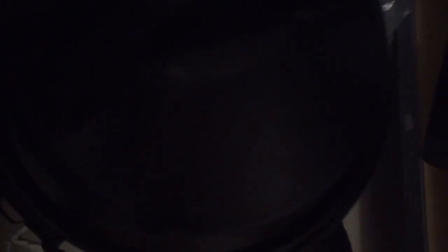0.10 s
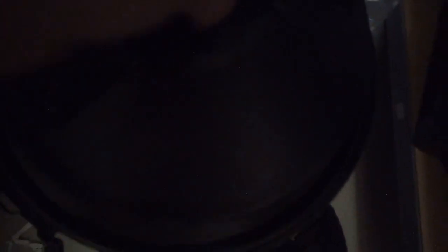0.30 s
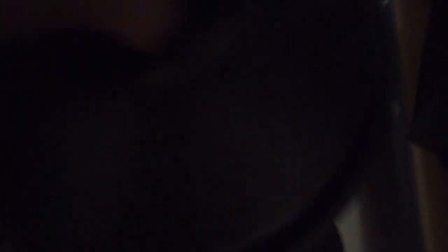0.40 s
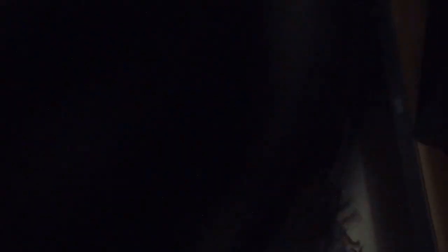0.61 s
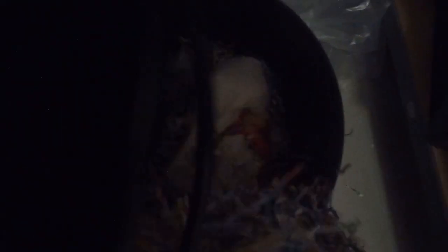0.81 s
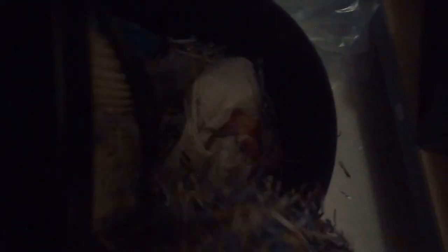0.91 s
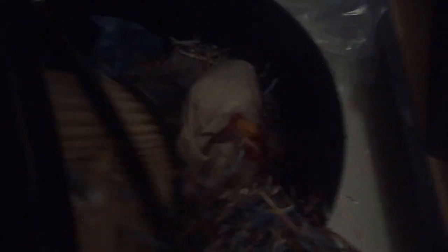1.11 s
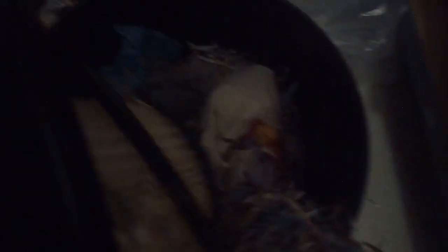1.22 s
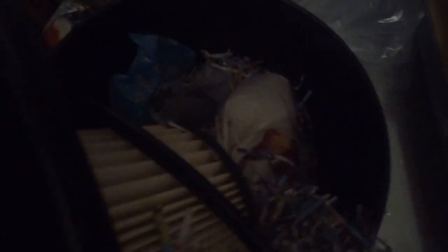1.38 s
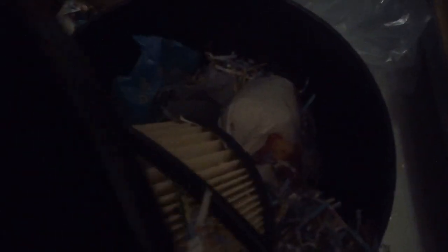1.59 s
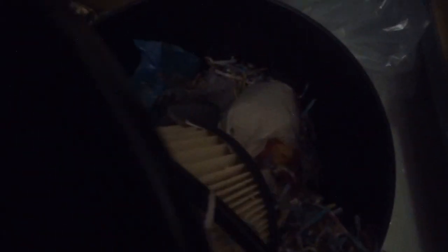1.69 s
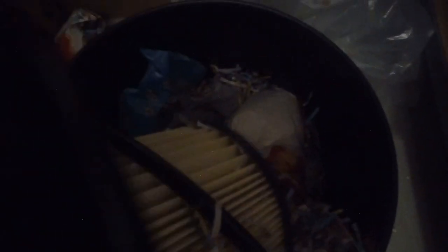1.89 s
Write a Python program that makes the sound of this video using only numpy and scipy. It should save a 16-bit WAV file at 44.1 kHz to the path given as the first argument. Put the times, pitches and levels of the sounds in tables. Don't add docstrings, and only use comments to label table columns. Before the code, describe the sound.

Plastic vacuum lid clatters, rasps and thuds against a drum rim, then groans into near silence

```python
import sys
import numpy as np
from scipy import signal
from scipy.fft import rfft, irfft, next_fast_len
from scipy.io import wavfile
from scipy.ndimage import map_coordinates

SR = 44100
rng = np.random.default_rng(int(sys.argv[2]) if len(sys.argv) > 2 else 0)


def unload_audio(sound):
    columns = np.transpose(np.atleast_2d(sound))
    steps = np.round(np.clip(columns, -1, 1) * 32767)
    wavfile.write(sys.argv[1], SR, steps.astype(np.int16))


def attenuation_scalar(level_db):
    decades = np.asarray(level_db, float) / 20
    return 10 ** decades


N = 83790
T = np.arange(N) / SR

# start in seconds, peak in dB, 60 dB decay in seconds,
# drum share in dB, sharp edge share in dB.
RIM_CONTACTS = [(0.0707, -45, 0.03, -25, 12), (.1575, -60, .06, -20, 3), (0.1995, -36, 0.52, 2.5, 0),
                (0.2165, -39.5, 0.046, 4, 8), (0.2232, -31.5, 0.082, 14.5, 7.5), (.231, -41, 0.051, 7, 7),
                (0.322, -52, .03, -13, 25), (0.3478, -25, 0.29, -28, 9.5), (0.375, -29.5, 0.19, 9, -10),
                (0.404, -30, 0.2, -25, 13), (0.427, -22, 0.14, -13, 10), (0.501, -32.5, 0.027, -2.5, -22.5),
                (0.5018, -26, 0.21, -4.5, -20.5), (.508, -38.5, 0.07, -11, -28),
                (0.575, -42, 0.18, -16, -8.5), (0.6811, -29.5, 0.13, 2, -4.5),
                (0.6877, -25, 0.37, 6.5, -4.5), (0.735, -25, 0.052, -4.5, 2.5), (0.7677, -31, 0.19, -34, 4),
                (.808, -38, 0.15, -14, -8.5), (0.856, -42.5, 0.15, -24.5, 12), (0.8986, -33, 0.2, 7, -24),
                (0.9222, -17.5, 0.23, -25, 8), (0.925, -18, 0.19, -26, 6), (0.9303, -19, .2, -26, 5.5),
                (0.9736, -16.5, 0.1, -36, 11), (0.978, -23, 0.81, -11, 6), (1.022, -20.5, 0.2, -6, -19),
                (1.049, -16, 0.28, -15.5, 8.5), (1.0865, -20.5, 0.03, -9, -3),
                (1.199, -52.5, 0.26, 33, -17), (1.313, -24, 0.24, -9, 9.5), (1.8635, -44, 0.036, -37, 8),
                (1.873, -45.5, 0.14, -21, -9), (1.895, -36, 0.09, -4, -25)]
# frequency in Hz, level in dB per Hz.
RASP_COLOUR = [(150, -24), (400, -36), (650, -10), (1100, 0.5), (2000, -2), (4500, 3), (7000, 3.5),
               (10000, -17.5)]
# frequency in Hz, level in dB per Hz.
EDGE_COLOUR = [(3000, -3), (7500, 14), (16000, 18.5)]
# frequency in Hz, level in dB, 60 dB decay in seconds.
DRUM_MODES = [(283, -10, 0.02), (600, -5, 0.03), (790, 0, 0.06), (855, 1, 0.07), (965, -4, .04),
              (1242, -5, 0.025), (1375, -4, 0.03), (1745, -9, .025), (2250, -7, 0.02), (3660, -15, 0.03)]
# start in seconds, peak in dB, pitch in Hz, 60 dB decay in seconds.
WALL_BUMPS = [(.003, -41, 230, 0.12), (0.028, -39, 268, 0.07), (0.053, -47.5, 340, 0.065),
              (.216, -35.5, 93, 0.15), (0.226, -31, 226, 0.074), (0.337, -33, 117.7, 0.23),
              (0.351, -26.5, 249, 0.15), (0.376, -26.5, 210.6, 0.18), (0.395, -23, 262, 0.053),
              (0.431, -27.5, 297.5, 0.22), (0.412, -32.5, 66.4, 0.14), (0.708, -42, 72.6, 0.26),
              (0.472, -25, 91.6, 0.13), (0.501, -18, 290, 0.042), (0.553, -38.5, 133.7, 0.24),
              (0.689, -22, 331, 0.061), (.7295, -23, 288, 0.5), (.7642, -27, 288, 0.5),
              (0.757, -27, 116, 0.1), (0.899, -15.5, 264, 0.048), (.909, -21.5, 324, 0.031),
              (0.902, -26.5, 98.6, 0.14), (1.05, -40, 276, 0.28), (1.194, -24, 217.4, 0.088),
              (1.208, -25.5, 69.5, 0.034), (1.319, -41, 281, 0.19)]
# frequency in Hz, level in dB, 60 dB decay in seconds.
LID_MODES = [(841, -21, 0.33), (1178, -26, 0.07), (1370, -27, 0.1), (1745, -28, 0.1), (2110, -29, 0.05),
             (3465, -33.5, 0.15)]
# time in seconds, slip rate in Hz, level in dB, second harmonic in dB.
GROAN_PATH = [
    (1.39, 147, -62, -70),
    (1.41, 146, -52, -58),
    (1.446, 142, -47, -44),
    (1.47, 140, -43, -43),
    (1.498, 138, -47, -58),
    (1.524, 132, -52, -62),
    (1.55, 128, -76, -76),
]
# start in seconds, length in seconds, pitch in Hz.
CHIRP_EVENTS = [(.635, .05, 1340), (.768, .06, 3424), (.77, .04, 4452), (.77, .045, 5523),
                (.815, .025, 1790), (1.56, .2, 2665), (1.79, .075, 2657), (1.73, .035, 1450),
                (1.3135, .007, 4500), (.436, .03, 810), (.25, .03, 3700), (.015, .03, 1290),
                (1.52, .08, 9400), (1.53, .06, 8600), (.155, .015, 9300), (1.8655, .003, 5400)]
CHIRP_LEVELS = [-52, -44, -52, -50, -52.5, -67, -72, -69, -21, -35, -50, -53, -45, -45, -42, -47]
# time in seconds, level in dB, second harmonic in dB, third harmonic in dB,
# unsteadiness from 0 to 1.
WHINE_PATH = [
    (0, -55, -5, -10, .03),
    (.04, -53, -5, -9, .028),
    (.1, -56, -9, -13, .025),
    (.185, -58, -10, -12, .02),
    (.225, -55, -8, -10, .012),
    (.255, -45, -12, -7, .006),
    (.29, -48, -15, -18, .008),
    (.33, -54, -1, 1, .01),
    (.37, -53, -3, -3, .012),
]
# time in seconds, debris level in dB, fine dust level in dB.
SLIDE_PATH = [(0, -49, -51), (.06, -60, -55.5), (.19, -71, -61), (.3, -73, -52), (.4, -43, -36),
              (.46, -45.5, -40.5), (.49, -45.5, -45), (.67, -56, -51.5), (.88, -54, -55.5),
              (1.1, -39.5, -49.5), (1.2, -35.5, -41.5), (1.305, -41.5, -42.5), (1.33, -34.5, -35),
              (1.39, -35.5, -35.5), (1.5, -44, -45), (1.6, -60.5, -54.5), (1.76, -72, -58.5),
              (1.8, -70.5, -68.5)]
# frequency in Hz, level in dB per Hz.
DEBRIS_COLOUR = [(60, -30), (250, -4), (620, -9.5), (1200, -2), (2500, -4), (5000, -10), (9000, -15.5),
                 (12000, -8.5)]
# frequency in Hz, level in dB per Hz.
DUST_COLOUR = [(1200, -28.5), (2600, -4.5), (4500, -1.5), (7000, -0.5), (12000, -9)]
# frequency in Hz, level in dB, 60 dB decay in seconds.
CAVITY_MODES = [(288, -10, .06), (775, 0, .06), (850, -1, .06), (1100, -8, .04), (1350, -6, .03)]
# frequency in Hz, 60 dB decay in seconds.
ROOM_DECAY = [(100, 0.33), (6000, 0.07)]
# frequency in Hz, level in dB per Hz.
HUSH_COLOUR = [(40, -3.5), (200, 1), (700, -25.5), (1500, -24), (2600, -15), (5000, -6), (9000, -2.5)]
# frequency in Hz, gain in dB.
MIC_RESPONSE = [(25, -19), (65, -1), (2500, -2), (4600, 1.5), (6300, -9), (7800, -32), (13800, -44.5),
                (15100, -37.5)]

ATTACK_S = .0009


def unit(x):
    return x / np.sqrt(np.mean(x ** 2) + 1e-20)


def along(points, hz):
    f, v = np.transpose(points)
    return np.interp(np.log(hz + 1), np.log(f + 1), v)


def curves(rows):
    s, *columns = np.transpose(rows)
    return [np.interp(T, s, column) for column in columns]


def wobble(rate):
    knots = rng.standard_normal(int(N * 3000 / SR) + 4)
    return map_coordinates(knots, [T * min(rate, 2900)])


def within(start, length, soft):
    return np.clip(np.minimum(T - start, start + length - T) / soft, 0, 1)


def dying(start, t60, attack):
    t = np.maximum(T - start, 0)
    return (1 - np.exp(-t / attack)) * attenuation_scalar(-60 * t / t60)


def grit(fine_db, clump_db):
    return unit(rng.standard_normal(N) * attenuation_scalar(fine_db * wobble(1200) + clump_db * wobble(110)))


def filtered(x, response, keep=True):
    size = next_fast_len(N + SR // 2)
    gain = response(np.fft.rfftfreq(size, 1 / SR))
    level = np.sqrt(np.mean(abs(gain) ** 2)) if keep else 1
    return irfft(rfft(x, size) * gain / level, size)[:N]


def coloured(x, spectrum, keep=True):
    def response(hz):
        cepstrum = irfft(np.log(attenuation_scalar(along(spectrum, hz)) + 1e-6))
        half = len(cepstrum) // 2
        cepstrum[1:half] *= 2
        cepstrum[half + 1:] = 0
        return np.exp(rfft(cepstrum))
    return filtered(x, response, keep)


def resonate(x, modes):
    def response(hz):
        total = 0
        for k, (centre, db, t60) in enumerate(modes):
            damping = 1j * hz * np.log(1000) / np.pi / t60
            total = total + (-1) ** k * attenuation_scalar(db) * damping / (centre ** 2 - hz ** 2 + damping)
        return total
    return filtered(x, response)


def scrape_drive(source, share_db, faster, crack_db):
    power = 0
    for (start, db, t60, *_), share in zip(RIM_CONTACTS, share_db):
        rasp = dying(start, t60 * faster, ATTACK_S)
        crack = dying(start, .012, ATTACK_S / 8)
        power = power + (attenuation_scalar(share) * attenuation_scalar(db - 2) * (rasp + attenuation_scalar(crack_db) * crack)) ** 2
    return source * np.sqrt(power)


def scrapes():
    _, _, _, drum_db, edge_db = np.transpose(RIM_CONTACTS)
    coarse = grit(fine_db=2, clump_db=1.5)
    hissy = grit(fine_db=.8, clump_db=1)
    rim = coloured(scrape_drive(coarse, 0 * drum_db, .84, crack_db=-3), RASP_COLOUR)
    body = resonate(scrape_drive(coarse, drum_db, .72, crack_db=-3), DRUM_MODES)
    edge = coloured(scrape_drive(hissy, edge_db, .6, crack_db=-9), EDGE_COLOUR)
    return rim + attenuation_scalar(-8) * body + attenuation_scalar(5) * edge


def hollow(x):
    length_s = .02
    t = np.arange(round(length_s * SR)) / SR
    echo = rng.standard_normal(len(t)) * attenuation_scalar(-30 * t / length_s)
    return x + attenuation_scalar(-10) * signal.fftconvolve(x, echo / np.linalg.norm(echo))[:N]


def bumps():
    drift = .45 * wobble(45)
    return sum(attenuation_scalar(db) * dying(start, t60, .00067) * np.sin(2 * np.pi * hz * (T - start) + drift)
               for start, db, hz, t60 in WALL_BUMPS)


def lid_ring():
    ring = 0
    for hz, db, t60 in LID_MODES:
        level = attenuation_scalar(db + 1.5 * wobble(60)) * dying(.685, t60, 2 * ATTACK_S)
        ring = ring + level * np.sin(2 * np.pi * hz * T + .7 * wobble(90))
    return ring


def groan():
    hz, db, second_db = curves(GROAN_PATH)
    turn = 2 * np.pi * np.cumsum(hz) / SR
    tone = attenuation_scalar(db + 3) * np.sin(turn) + attenuation_scalar(second_db + 3) * np.sin(2 * turn + 1.3)
    return tone * within(1.39, .16, .01)


def chirps():
    total = 0
    for (start, length, hz), db in zip(CHIRP_EVENTS, CHIRP_LEVELS):
        level = attenuation_scalar(db + 2.5 * wobble(120)) * within(start, length, .2 * length)
        total = total + level * np.sin(2 * np.pi * hz * T + .7 * wobble(150))
    return total


def whine():
    db, second_db, third_db, shaky = curves(WHINE_PATH)
    hz = 1578 * np.exp(-.98 * T) * (1 + shaky * wobble(300))
    turn = 2 * np.pi * np.cumsum(hz) / SR
    tone = sum(attenuation_scalar(db + 4 + over_db + 2 * wobble(90)) * np.sin(k * turn)
               for k, over_db in ((1, 0), (2, second_db), (3, third_db)))
    return tone * within(-.1, .5, .04)


def slide():
    level_db, dust_db = curves(SLIDE_PATH)
    debris = grit(fine_db=2.2, clump_db=1) * attenuation_scalar(level_db + 4)
    air_db = level_db + 4 + .15 * (level_db - level_db.max())
    air = grit(fine_db=1, clump_db=1.5) * attenuation_scalar(air_db) * within(.6, 2, .3)
    dust = grit(fine_db=2, clump_db=1.2) * attenuation_scalar(dust_db + 4)
    return coloured(debris, DEBRIS_COLOUR) + attenuation_scalar(-5.5) * resonate(air, CAVITY_MODES) + coloured(dust, DUST_COLOUR)


def room(x):
    block, delay = 8192, 300
    out = np.zeros(N + SR)
    for start in range(0, N, block):
        hz, t, z = signal.stft(rng.standard_normal(SR // 2), SR, nperseg=256)
        decay = attenuation_scalar(-60 * t / along(ROOM_DECAY, hz)[:, None])
        tail = signal.istft(z * decay, SR, nperseg=256)[1]
        part = signal.fftconvolve(x[start:start + block], tail / np.linalg.norm(tail))
        out[start + delay:][:len(part)] += part
    return out[:N]


def hush():
    return attenuation_scalar(-59) * coloured(rng.standard_normal(N), HUSH_COLOUR)


def scene():
    rim = hollow(scrapes())
    notes = bumps() + lid_ring() + groan() + chirps() + whine()
    far = attenuation_scalar(-8) * room(rim + attenuation_scalar(-6) * notes)
    return (rim + notes + far + hollow(slide()) + hush())[None]


def low_pass(x):
    return signal.sosfilt(signal.butter(12, 16800, fs=SR, output="sos"), x)


def record(dry):
    hiss = filtered(rng.standard_normal(N), lambda hz: np.exp(-((hz - 15200) / 800) ** 2))
    heard = coloured(dry[0], MIC_RESPONSE, keep=False)
    heard = heard + attenuation_scalar(-91) * hiss + attenuation_scalar(-96) * rng.standard_normal(N)
    heard = filtered(heard, lambda hz: attenuation_scalar(-34 * (hz > 15950)), keep=False)
    return low_pass(heard[None])


dry = scene()
out = record(dry)
unload_audio(out)
```